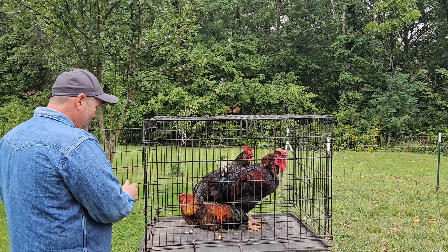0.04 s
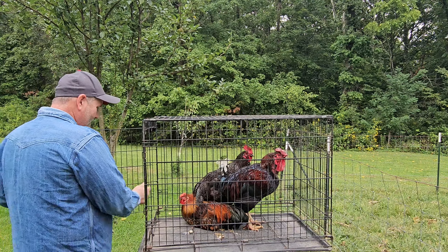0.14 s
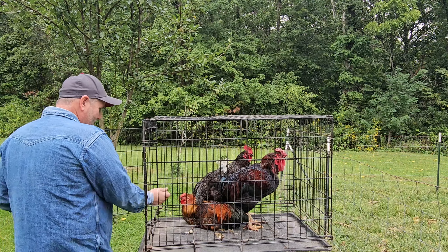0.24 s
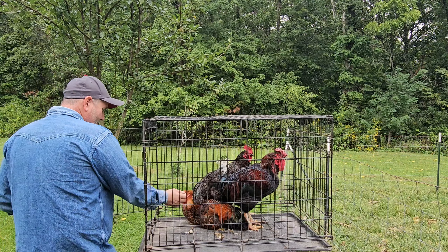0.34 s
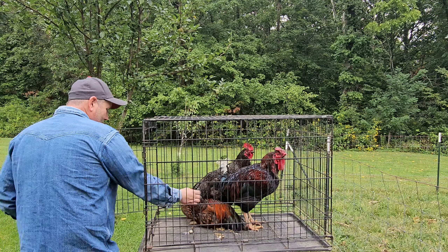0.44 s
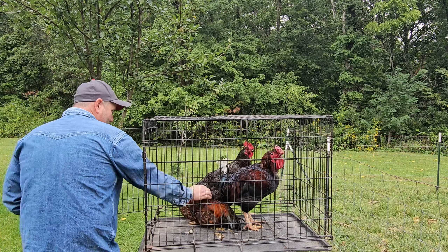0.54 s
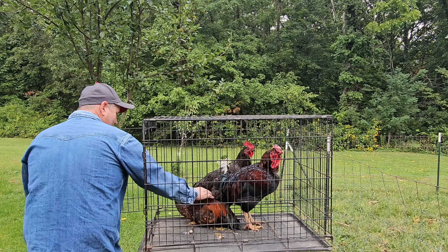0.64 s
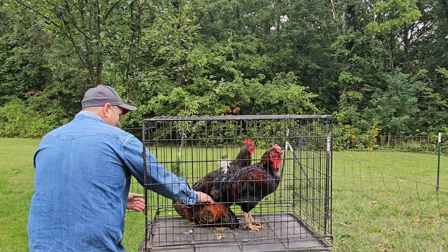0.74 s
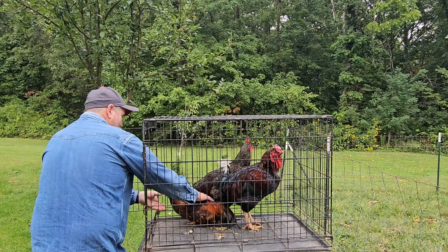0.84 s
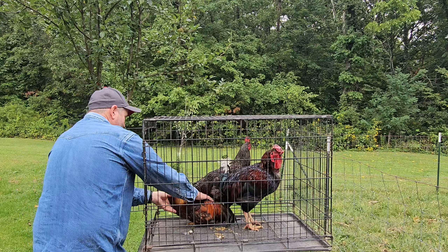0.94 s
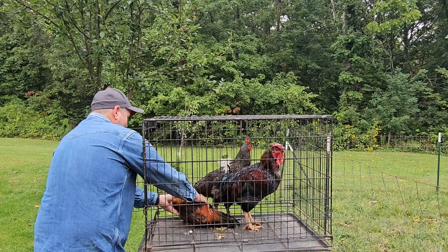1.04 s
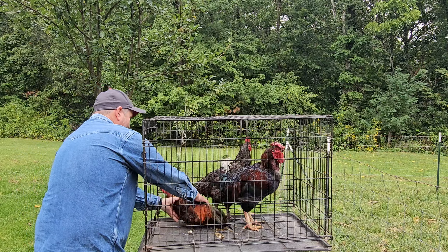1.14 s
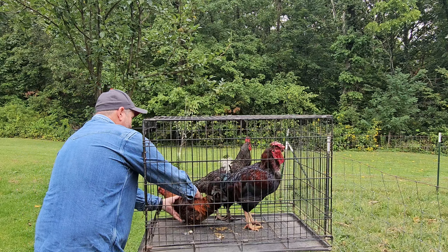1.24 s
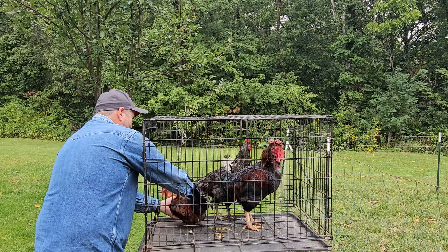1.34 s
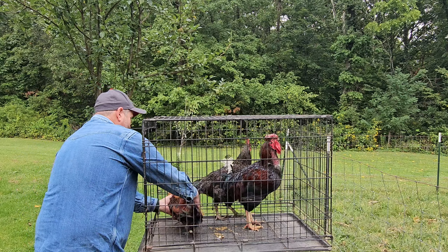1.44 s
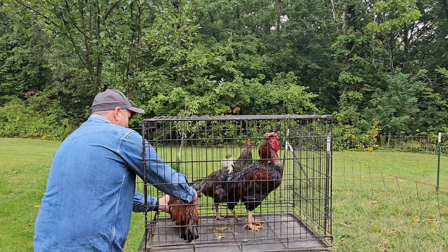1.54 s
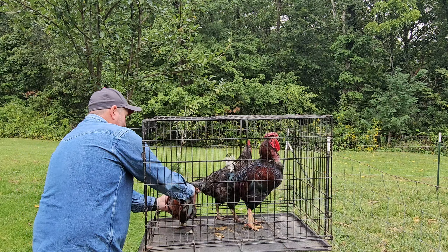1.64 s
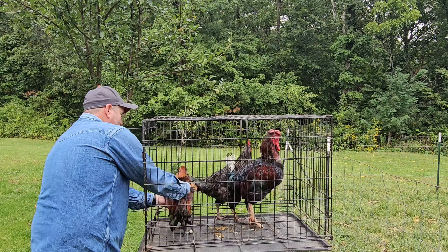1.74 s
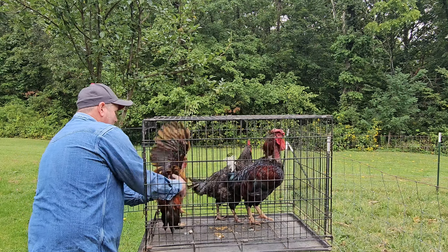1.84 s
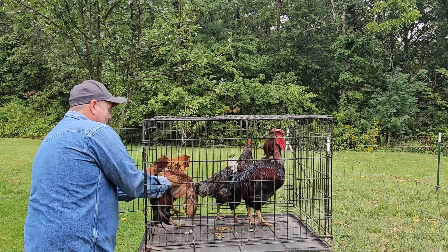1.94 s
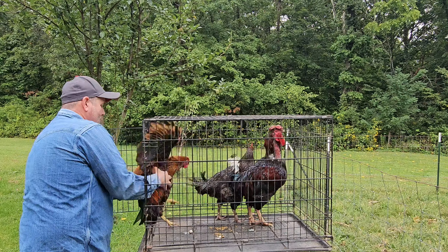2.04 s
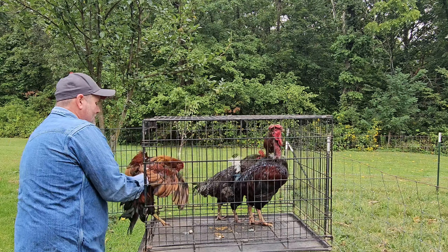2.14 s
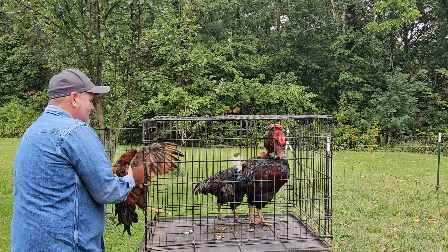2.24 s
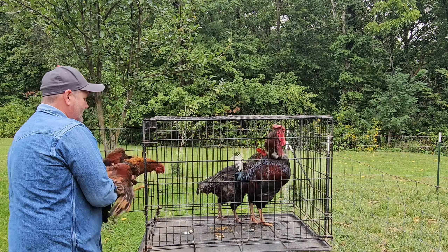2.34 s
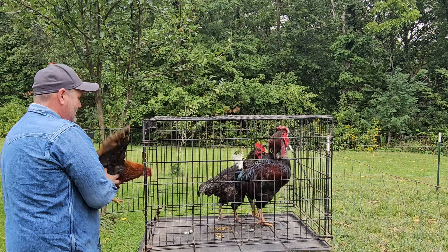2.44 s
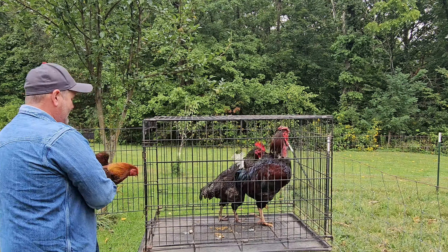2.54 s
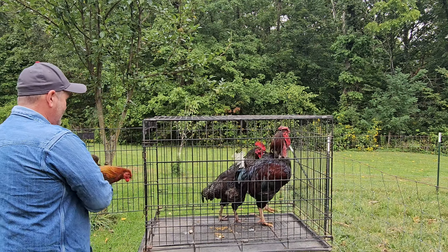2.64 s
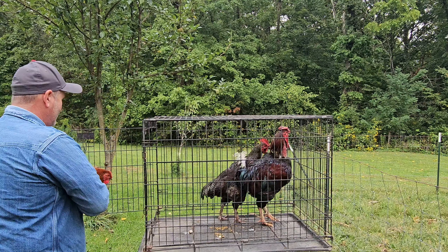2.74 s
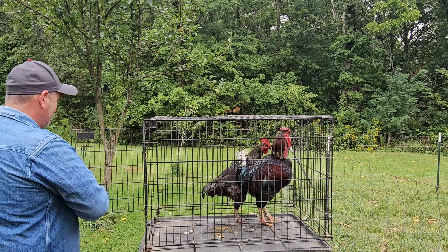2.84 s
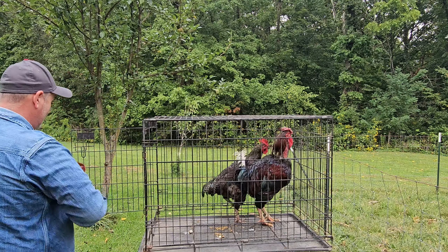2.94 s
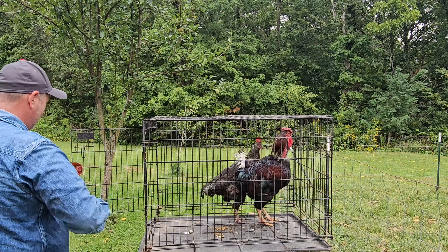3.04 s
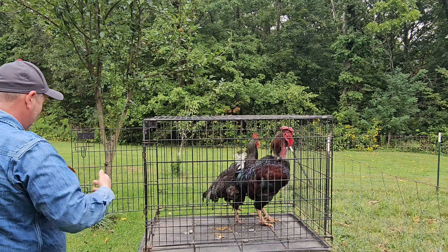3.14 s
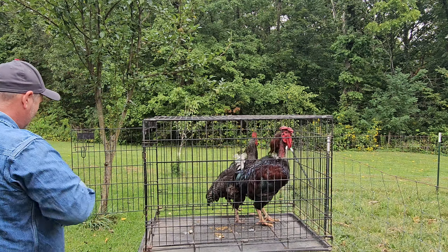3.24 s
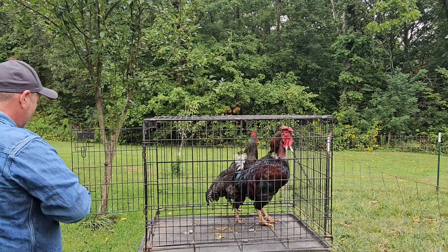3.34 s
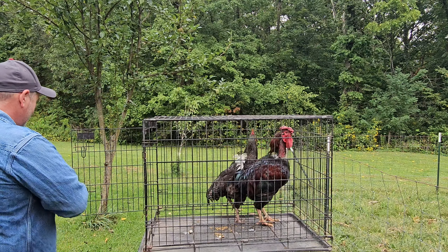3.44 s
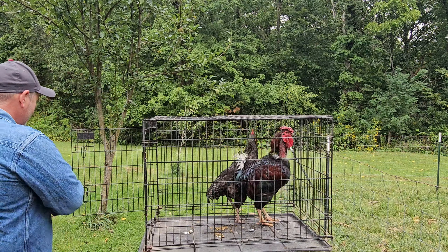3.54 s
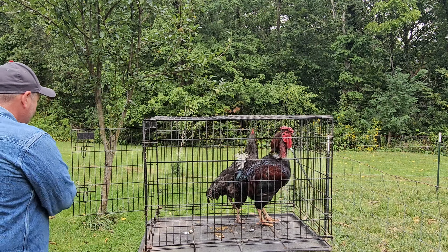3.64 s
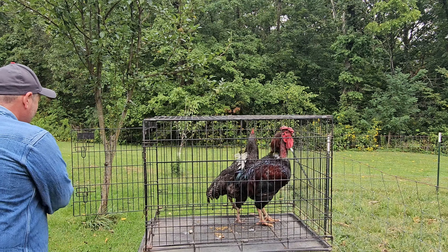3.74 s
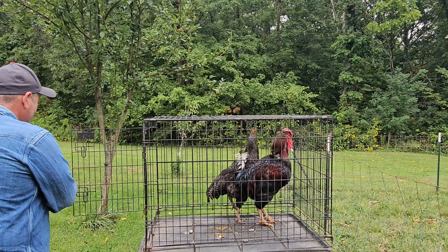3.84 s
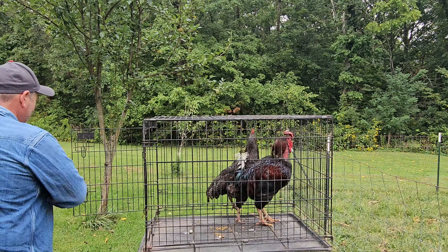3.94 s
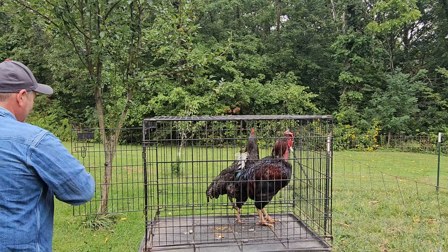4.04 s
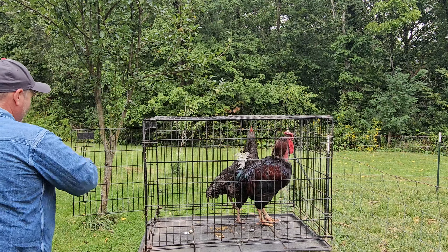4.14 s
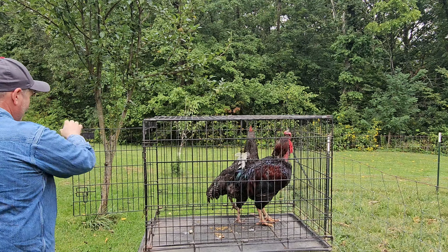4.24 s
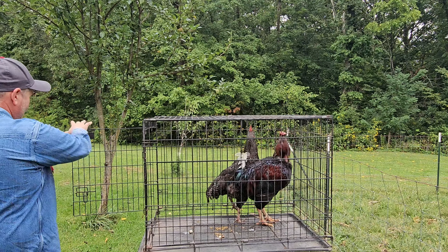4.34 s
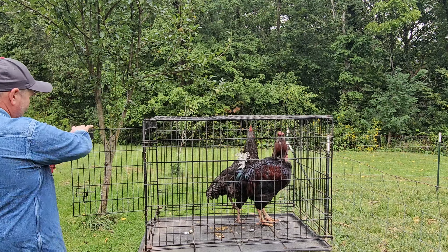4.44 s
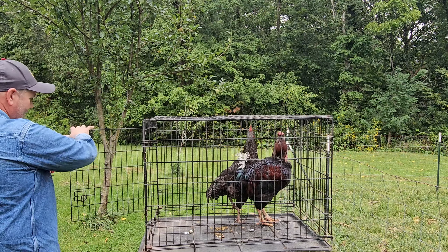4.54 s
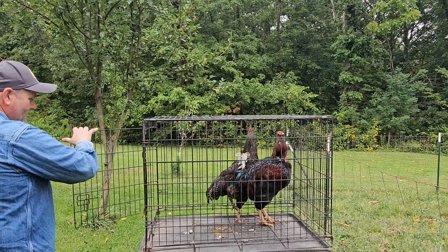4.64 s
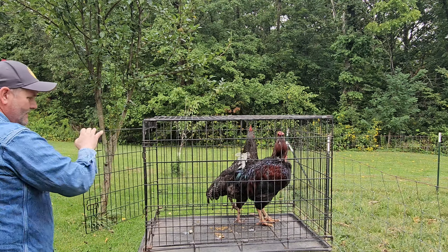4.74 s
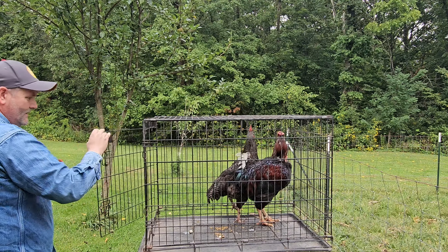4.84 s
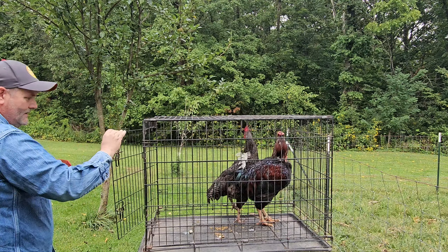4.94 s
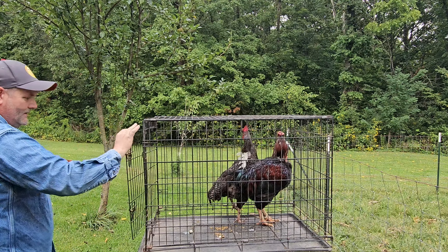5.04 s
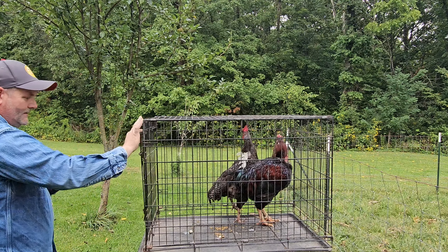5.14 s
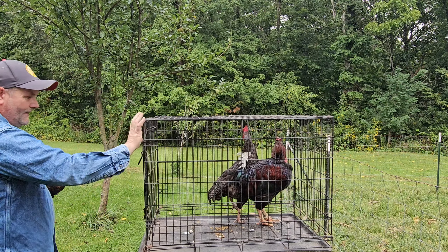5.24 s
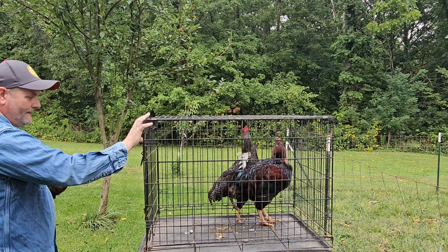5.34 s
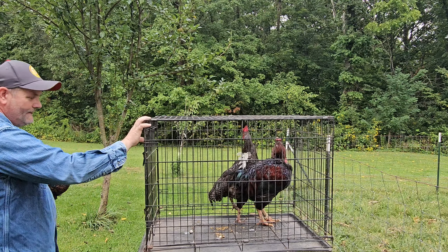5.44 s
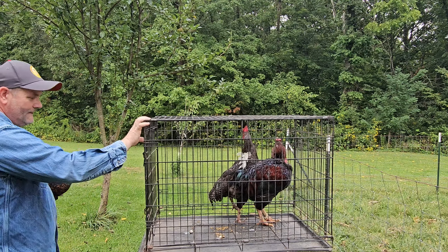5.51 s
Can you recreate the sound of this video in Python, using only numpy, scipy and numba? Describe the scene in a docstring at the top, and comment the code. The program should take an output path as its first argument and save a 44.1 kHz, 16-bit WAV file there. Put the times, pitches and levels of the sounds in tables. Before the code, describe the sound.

Over faint high insects and quiet air, a held rooster clucks softly, then protests in harsh, rising squawks as wings beat and claws scrape a wire crate with a booming plastic floor. The struggle fades to spaced clucks, some lower from a caged bird. Finally the metal door shakes and clatters closed. Nearby microphones, dry open air, slight echo from trees.

```python
"""Roosters in a wire crate

Roosters cluck and squawk in a wire crate on a lawn while one is pulled out, flapping and kicking the plastic tray.
Then the wire door swings and rattles shut. Insects sing in the wood behind, which sends back a faint echo.
Voices are pulse trains through throat and beak; feathers, gusts, cloth, insects and air are coloured noise;
tray, wires and frame are ringing tones set off by short crackles."""
import sys
import numpy as np
from scipy import signal
from scipy.fft import rfft, irfft, next_fast_len
from scipy.io import wavfile
from scipy.ndimage import uniform_filter1d
from numba import njit

SR = 44100
rng = np.random.default_rng(int(sys.argv[2]) if len(sys.argv) > 2 else 0)


def to_wav(sig):
    """Store sig (one row per channel, or 1-D mono) as 16-bit WAV at the path in sys.argv[1].

    Samples outside -1..1 are clipped; the rate is SR.
    """
    pcm = np.clip(np.atleast_2d(sig), -1, 1) * 32767
    pcm = np.round(pcm).astype(np.int16)
    wavfile.write(sys.argv[1], SR, pcm.T)  # frames by channels


N = 245754
TIME = np.arange(N) / SR
CUTOFF_HZ = 16000  # nothing is kept above this
# Feet and wings striking the crate, before each part's own gain: t/s, tray level/dB, wire level/dB
KNOCKS = [(0.118, -55.5, -56), (0.548, -53, -51), (0.674, -53, -71), (.94, -45.5, -59), (1.085, -40, -45),
          (1.123, -46, -39.5), (1.149, -32.5, -36), (1.19, -34, -37), (1.205, -44, -47.5),
          (1.591, -19.5, -26.5), (1.598, -34, -57), (1.988, -29.5, -36.5), (2.005, -33, -35.5),
          (2.038, -39.5, -41), (2.068, -36, -39), (2.875, -43.5, -50), (3.073, -49, -66),
          (3.627, -47.5, -66)]


def from_db(db):
    """Turn decibels into a gain."""
    return 10 ** (np.asarray(db) / 20)


def rms_one(x):
    """Scale a sound to an average power of 1."""
    return x / np.sqrt(np.mean(x ** 2) + 1e-20)


def at_hz(points, hz):
    """Read a table along a logarithmic frequency axis, as the ear spaces pitch."""
    f, value = np.transpose(points)
    return np.interp(np.log(np.maximum(hz, 1)), np.log(f), value)


def level(rows):
    """Gain over time from (t/s, level/dB) rows, practically silent outside them."""
    s, db = np.transpose(rows)
    return from_db(np.interp(TIME, s, db, left=-120, right=-120))


def swell(s, rise_s, decay_s, hold_s=0):
    """An envelope of height 1: grows until s, holds, then dies away exponentially."""
    growing = np.maximum(s - TIME, 0) / abs(rise_s)
    dying = np.maximum(TIME - s - hold_s, 0) / abs(decay_s)
    return np.exp(-np.minimum(growing + dying, 20))


def shape(x, gain_at):
    """Filter by a gain given as a function of frequency."""
    size = next_fast_len(x.shape[-1] + 2048)  # spare room at the end limits wrap-around
    hz = np.arange(size // 2 + 1) * SR / size
    return irfft(rfft(x, size) * gain_at(hz), size)[..., :x.shape[-1]]


def colour(x, spectrum):
    """Filter by an (f/Hz, level/dB) table."""
    return shape(x, lambda hz: from_db(at_hz(spectrum, hz)))


def highpass(x, order, hz):
    """Keep what lies above a frequency."""
    return signal.sosfilt(signal.butter(order, hz, "high", fs=SR, output="sos"), x)


def drift(rate, size=N):
    """Smooth random wandering with a spread near 1, heading for `rate` new values a second."""
    at = np.arange(size) * rate / SR
    return np.interp(at, np.arange(size), rng.standard_normal(size))


def ring(clicks, hz, t60):
    """A unit click sets a sine of height 1 ringing; it falls by 60 dB in t60 seconds."""
    r, w = from_db(-60 / (t60 * SR)), 2 * np.pi * hz / SR
    return signal.lfilter([0, np.sin(w)], [1, -2 * r * np.cos(w), r * r], clicks + 1e-18)


def ring_modes(clicks, modes):
    """A solid body rings in several (f/Hz, level/dB, t60/s) modes with alternating signs."""
    return sum((-1) ** k * from_db(db) * ring(clicks, hz, t60) for k, (hz, db, t60) in enumerate(modes))


def burst(s, decay_s, rise_s=0.002):
    """A contact: a short crackle of unit energy that starts at s, swells and dies."""
    out, start = np.zeros(N), int(s * SR)
    age = np.arange(min(4096, N - start)) / SR
    crackle = rng.standard_normal(len(age)) * np.exp(-age / decay_s) * (1 - np.exp(-age / rise_s))
    out[start:start + len(age)] = crackle / np.linalg.norm(crackle)
    return out


def spread(pair):
    """Two unrelated signals become a stereo sound, alike in the bass and apart in the treble."""
    # How alike the left and right microphones hear: f/Hz, likeness (1 = the same, 0 = unrelated)
    likeness = [(30, .86), (80, .98), (250, .95), (1200, .96), (2000, .45), (4000, .1), (8000, 0),
                (16000, 0)]
    alike = lambda hz: np.clip(at_hz(likeness, hz), -1, 1)
    mid = shape(pair[0], lambda hz: np.sqrt((1 + alike(hz)) / 2))
    side = shape(pair[1], lambda hz: np.sqrt((1 - alike(hz)) / 2))
    return np.array([mid + side, mid - side])


def noise(spectrum):
    """Smooth stereo noise of a given colour."""
    return rms_one(spread(colour(rng.standard_normal((2, N)), spectrum)))


def from_left(pair, lead_s=.00012):
    """Sound arriving from the left reaches the right microphone later."""
    return np.array([pair[0], np.pad(pair[1], (round(lead_s * SR), 0))[:N]])


def meadow(insect_db=-60, air_db=-62, hum_db=-64, hum_hz=154, hum_t60=1.0):
    """Insects and still air are steady coloured noise; the distant hum is noise ringing at one pitch."""
    # Colour of the insect chorus: f/Hz, level/dB
    chorus = [(2500, -38.5), (3800, -15.5), (4400, 1.5), (4950, 5.5), (5600, -1), (6500, -2.5),
              (7500, -9.5), (9000, -21.5), (16000, -35)]
    # Colour of the still air: f/Hz, level/dB
    still_air = [(25, -16), (80, 1), (160, 1.5), (300, -10), (500, -14.5), (1000, -17.5), (2000, -21.5),
                 (4000, -20), (8000, -33), (10300, -39.5), (13000, -29), (16000, -30.5)]
    # Slow swelling of the hum around its basic level: t/s, level/dB
    hum_swell = [(0, 1), (.8, 5), (1.5, 0), (3.9, -16.5), (4.3, -2.5), (4.7, -23), (5.6, 1)]
    hum = rms_one(ring(rng.standard_normal(N), hum_hz, hum_t60))
    insects = from_db(insect_db) * noise(chorus)
    return insects + from_db(air_db) * noise(still_air) + from_db(hum_db) * level(hum_swell) * hum


def feathers(clump_db=4, grain_db=2.0, rustle_db=-2, flick_db=19):
    """Barbs slip in clumps of tiny grains; stiff quills and claws snap past the bars."""
    # How hard the held bird struggles, before the gains below: t/s, rustle level/dB
    struggle = [(0, -57), (.35, -69), (.62, -60), (.78, -84), (.95, -55.5), (1.2, -55.5), (1.68, -51),
                (1.78, -59), (1.92, -41), (2.4, -46), (2.8, -65), (3.15, -57), (3.53, -62.5), (3.9, -75),
                (5.57, -82)]
    # A wing or tail brushing past hands and bars, before those gains: t/s, peak level/dB, swell/s, decay/s
    brushes = [(.685, -49.5, 0.014, 0.013), (1.115, -49, .025, 0.091), (1.48, -41.5, 0.06, 0.13),
               (1.598, -32, 0.02, 0.021), (1.98, -45, 0.08, 0.058), (2.199, -31.5, .028, .02),
               (2.489, -34, 0.029, 0.028), (2.655, -46, 0.15, 0.057), (2.89, -62, 0.022, 0.027)]
    # Quills and claws flicking the bars, before flick_db and the gain at the end: t/s, level/dB
    flick_rows = [(0.6454, -37), (0.6753, -34), (1.1022, -31.5), (1.1268, -29), (1.1498, -20),
                  (1.1906, -29), (1.2048, -28.5), (1.422, -33), (1.5207, -23), (1.5441, -22.5),
                  (1.5628, -26), (1.5835, -20), (1.6942, -34), (1.8777, -33), (1.9082, -25), (1.9875, -30),
                  (2.003, -27), (2.0378, -27), (2.0688, -29.5), (2.1181, -29.5), (2.1934, -20),
                  (2.4024, -25.5), (2.4523, -27.5), (2.8906, -36.5)]
    # Colour of feathers: f/Hz, level/dB
    feather_colour = [(300, -2), (700, 2), (1500, -4), (3000, 0), (4500, -3.5), (6800, -1), (8500, -10),
                      (10300, -20), (12000, -12.5), (16000, -21.5)]
    grains = rng.standard_normal((2, N)) * from_db(grain_db * drift(2500) + clump_db * drift(130))
    brushing = sum((from_db(db) * swell(s, rise_s, decay_s)) ** 2 for s, db, rise_s, decay_s in brushes)
    sliding = from_db(rustle_db) * np.sqrt(level(struggle) ** 2 + brushing) * rms_one(grains)
    flick_side = lambda: sum(from_db(db + flick_db) * burst(s, .0035, rise_s=.003) for s, db in flick_rows)
    flicks = highpass(np.array([flick_side() for side in range(2)]), 1, 3500)
    return from_db(8.0) * spread(colour(sliding + flicks, feather_colour))


def tray(contact_s=0.0014, tray_db=-2):
    """Each knock sets the plastic floor booming in its own modes."""
    # Modes of the plastic tray: f/Hz, level/dB, t60/s
    tray_modes = [(90, -8, 0.14), (136.7, -13, 0.24), (202.6, -11, 0.12), (252.8, -8, 0.29),
                  (452, -6, 0.12), (507.5, -4.5, 0.29), (591, -3, 0.1), (776, -1.5, 0.11),
                  (831, -4.5, 0.12), (1130, -2, 0.023), (1390, -14, 0.11), (1750, -20.5, 0.0077)]
    blows = sum(from_db(db) * burst(s, contact_s) for s, db, wire_db in KNOCKS)
    return from_db(tray_db) * ring_modes(blows, tray_modes)


def wires(drive, t60_at_1khz=0.14, damping_slope=0.48, ring_db=-11, count=170):
    """The welded bars have many close modes, and the higher ones die sooner."""
    # Strength of the wire modes along the spectrum: f/Hz, level/dB
    wire_colour = [(700, -9), (1300, -3), (2000, -1), (3200, 0), (4500, -3), (7000, -1), (10000, -10),
                   (15000, -9)]
    out = np.zeros((2, N))
    mode_hz = np.linspace(np.sqrt(700), np.sqrt(15500), count) ** 2
    for hz, (detune, left, right) in zip(mode_hz, rng.standard_normal((count, 3))):
        t60 = t60_at_1khz * (1000 / hz) ** damping_slope
        mode = from_db(at_hz(wire_colour, hz)) * ring(drive, hz * (1 + 0.0147 * detune), t60)
        out[0] += np.sign(left) * mode
        out[1] += right * mode
    return from_db(ring_db) * spread(out)


def jostling(door, jostle_db=-6, jostle_t60=0.82):
    """The loose panels store the door's energy and give it back slowly as a fluttering rattle."""
    # Colour of the jostling panels: f/Hz, level/dB
    jostle_colour = [(40, -17), (80, 6.5), (150, -14), (240, 11), (330, -8.5), (500, 8.5), (670, -12),
                     (850, 3.5), (1100, -3), (2000, -5.5), (3000, -2), (4500, -13.5), (7000, -18),
                     (16000, -44)]
    keep = from_db(-120 / (jostle_t60 * SR))  # energy, so twice the decibels
    stored = signal.lfilter([1 - keep], [1, -keep], door ** 2)
    return from_db(jostle_db) * np.sqrt(stored) * noise(jostle_colour) * from_db(2.2 * drift(70))


def cage(chatter_db=-34, frame_db=-8, kick_frame_db=-22, clink_db=6, ticks_per_s=2500):
    """Kicks and the chattering door shake the bars; the frame rings briefly and the loose panels jostle on."""
    # The door jolts on its hinges, then chatters on the frame, before the gains above:
    # t/s, level/dB, hold/s, decay/s, added clinking level/dB
    door_hits = [(4.827, -48, 0.015, 0.046, -13), (5.271, -35.5, 0.041, 0.034, 0.5)]
    # Bending modes of the frame: f/Hz, level/dB, t60/s
    frame_modes = [(153, -4, .4), (200, -4, .35), (244, -2, .35), (455, -8, .25), (502, -7, .25),
                   (805, -7, .25), (867, -6, .25), (1370, -3, .2), (1950, -2, .2), (2025, 0, .2),
                   (2570, -3, .18), (2835, -2, .18), (2915, -1, .2), (3155, -3, .18), (6310, 0, .12)]
    # Colour of wire ticking on wire: f/Hz, level/dB
    clink_colour = [(300, -29), (1500, -10.5), (4000, -9.5), (6800, -9), (8500, -10.5), (10300, -13),
                    (12000, -9), (16000, -17)]
    door, clinking = np.zeros(N), np.zeros(N)
    for s, db, hold_s, decay_s, bright_db in door_hits:
        jolt = from_db(db) * swell(s, 0.0053, decay_s, hold_s)
        door += jolt
        clinking += jolt * from_db(bright_db)
    # both channels tick at the same random moments, with different strengths
    chatter = rms_one(rng.standard_normal((2, N)) * (rng.random(N) < ticks_per_s / SR))
    shaking = from_db(chatter_db) * door * chatter[0]
    kicks = sum(from_db(db) * burst(s, 0.0012) for s, tray_db, db in KNOCKS)
    frame = from_db(frame_db) * ring_modes(shaking + from_db(kick_frame_db) * kicks, frame_modes)
    clinks = from_db(clink_db) * spread(colour(clinking * chatter, clink_colour))
    return wires(kicks + shaking) + frame + jostling(door) + clinks


def sleeves():
    """Shirt sleeves slide as the arms reach: bright noise that comes and goes."""
    # Loudness of the sliding cloth: t/s, level/dB
    sleeve_level = [(.33, -72), (.5, -60.5), (.63, -49), (.72, -76), (2.9, -73), (3.17, -54), (3.33, -69),
                    (3.42, -71), (3.53, -57.5), (3.8, -83)]
    # Colour of the cloth: f/Hz, level/dB
    cloth_colour = [(500, -22), (3000, -8), (7000, 5), (10300, -5.5), (12500, 3), (16000, -2.5)]
    return level(sleeve_level) * noise(cloth_colour)


@njit
def throat(x, hz, width, sr):
    """A hollow space strengthens one band of pitches; here its centre moves."""
    y, r = np.zeros(len(x)), np.exp(-np.pi * width / sr)
    for i in range(2, len(x)):
        turn = 2 * r * np.cos(2 * np.pi * hz[i] / sr)
        y[i] = x[i] - x[i - 2] + turn * y[i - 1] - r * r * y[i - 2]
    return y


def evened(x):
    """Hold the level near 1 by dividing by the average over about 9 ms."""
    return x / np.sqrt(np.abs(uniform_filter1d(x * x, 400)) + 1e-12)


def call(row, beak, throat_width_hz, jitter, shimmer, throat_rasp, beak_rasp):
    """One cluck or squawk: the syrinx (voice organ) pulses, less evenly when rough, through throat and beak."""
    (s, rise_s, fall_s, swell_db, start_hz, top_hz, end_hz,
     low_db, throat_db, centre_hz, beak_db, roughness) = row
    catch_s = .014  # the voice fades in over this time
    span = np.arange(int((s - rise_s - catch_s / 2) * SR), int((s + fall_s) * SR))
    t, size = span / SR, len(span)
    before, after = np.clip((s - t) / rise_s, 0, 1), np.maximum(t - s, 0) / fall_s

    # it swells to the climax, then is choked off by 23.5 dB; the pitch bends along
    effort = from_db(-swell_db * before - 23.5 * after ** 2.01)
    pitch = top_hz + (start_hz - top_hz) * before ** 1.5 + (end_hz - top_hz) * after ** 1.266
    throat_hz = centre_hz * pitch / top_hz  # the throat tightens with the syrinx
    # the resonance narrows as the throat level rises above -32 dB, an ordinary cluck
    width_hz = throat_width_hz * np.exp(-0.017 * (throat_db + 32))
    # extra roughness while the voice catches and lets go
    rough = roughness + 0.43 * (before + after) ** 2

    phase = 2 * np.pi * np.cumsum(pitch * (1 + jitter * rough * drift(496.2, size))) / SR
    order = np.arange(2, int(CUTOFF_HZ / pitch.max()))[:, None]
    overtones = rms_one(np.cos(order * phase).sum(0))
    # air hisses through once a cycle; under strain every other cycle is weaker
    hiss = rms_one(rng.standard_normal((2, size)) * (1 + 0.2 * np.cos(phase)))
    overtones = overtones * (1 + .35 * rough * np.cos(phase / 2))
    voiced = overtones + throat_rasp * rough * hiss[0]
    for stage_hz in (width_hz, 2 * width_hz, 2 * width_hz):
        voiced = throat(voiced, throat_hz, stage_hz, SR)
    bright = highpass(colour(overtones + beak_rasp * (rough + 0.25) * hiss[1], beak), 4, 1600)

    fundamental = from_db(low_db) * np.sqrt(2) * np.sin(phase)
    sound = effort * (fundamental + from_db(throat_db) * evened(voiced) + from_db(beak_db) * evened(bright))
    tremor = 1 + np.clip(shimmer * rough, 0, .7) * np.tanh(drift(220, size))
    catch = np.sin(np.pi / 2 * np.minimum((t - t[0]) / catch_s, 1)) ** 2
    out = np.zeros(N)
    out[span] = sound * tremor * catch * signal.windows.tukey(size, .1)
    return out


def placed(voice, lead_s, scatter_db=-5, scatter_s=0.0071, ground_db=-22, ground_s=0.019):
    """A voice reaches one microphone first; the bars scatter its overtones, crate and lawn add a short blur."""
    direct = np.array([voice, np.interp(TIME - lead_s, TIME, voice)])
    treble = highpass(voice, 4, 2000)

    def blur(x, decay_s):
        """Many tiny reflections smear a sound, differently at each microphone."""
        smear = lambda: np.trim_zeros(burst(0.00075, decay_s), "b")
        return np.array([signal.oaconvolve(x, smear())[:N] for side in range(2)])

    return direct + from_db(scatter_db) * blur(treble, scatter_s) + from_db(ground_db) * blur(voice, ground_s)


def roosters():
    """The held bird protests shrilly; one left in the crate answers with low, hollow clucks."""
    # Each call swells to a climax and is choked off; its pitch bends from start through climax to end.
    # Calls of the held bird: climax t/s, rise/s, fall/s, swell/dB, start f/Hz, climax f/Hz, end f/Hz,
    # fundamental level/dB, throat level/dB, throat f/Hz, beak overtone level/dB, roughness (0-1)
    held_calls = [ (.522, 0.017, .021, 4, 533, 533, 395, -36, -42, 1110, -47, 0.5),
                  (0.903, 0.02, 0.029, 6.5, 440.5, 503.4, 410, -36, -37, 1090, -48.5, 0.46),
                  (.994, 0.0081, 0.03, 4, 473, 489, 408, -41.5, -45, 860, -64, 0.56),
                  (1.147, 0.013, 0.015, 15, 454.4, 487, 450, -31.5, -36, 1150, -38.5, 0.59),
                  (1.345, .023, 0.013, 10, 458, 553.3, 477, -34.5, -31, 1030, -45, 0.44),
                  (1.503, 0.024, 0.032, 9, 554, 526, 514, -36, -40, 1220, -44, 0.45),
                  (1.722, .025, 0.022, 5.5, 487, 570, 555, -32, -32.5, 1150, -42, 0.38),
                  (1.910, 0.028, 0.017, 8.5, 534, 639, 580, -35.5, -34, 1340, -44.5, 0.59),
                  (1.986, 0.024, 0.018, 5.5, 569, 617, 540, -42.5, -30.5, 1280, -39.5, .68),
                  (2.146, 0.05, 0.042, 4.5, 598, 644.4, 595, -44, -22.5, 1250, -33.5, 0.56),
                  (2.283, 0.037, .020, 12, 621, 642.3, 650, -51.5, -15.5, 1290, -32.5, .1),
                  (2.374, .030, 0.029, 11, 644, 622, 603, -43, -21.5, 1314, -34, .45),
                  (2.484, .020, 0.049, 16, 611, 641, 609, -41.5, -20.5, 1304, -30, 0.61),
                  (2.547, .016, 0.033, 6.5, 468, 488, 396, -43, -37.5, 1020, -52, 0.8),
                  (2.688, .034, .032, 6.5, 555, 616, 532, -32, -33.5, 1220, -36.5, 0.2),
                  (2.797, 0.02, 0.061, 13.5, 530, 564.5, 488, -36.5, -28.5, 1080, -41.5, 0.56),
                  (3.045, 0.035, 0.017, 19.5, 490, 549, 538, -29.5, -22, 990, -42, 0.1),
                  (3.359, 0.019, 0.017, 9, 496, 455.4, 408, -46.5, -29, 884, -54, 0.22),
                  (3.723, 0.03, 0.016, 11, 392, 425, 375, -53.5, -28, 966, -49, 0.56),
                  (4.156, 0.029, 0.017, 18, 441, 548, 528, -37.5, -27, 1100, -47.5, 0.12), ]
    # Low clucks of the bird left in the crate: climax t/s, rise/s, fall/s, swell/dB, start f/Hz,
    # climax f/Hz, end f/Hz, fundamental level/dB, throat level/dB, throat f/Hz, beak overtone level/dB,
    # roughness (0-1)
    caged_calls = [ (1.107, .012, 0.013, 5.2, 230.5, 254, 220, -39, -41, 580, -55, 0.68),
                   (2.658, .036, .014, 4.5, 214.7, 312, 315, -47.5, -36.5, 647, -60, 1),
                   (2.856, .019, 0.014, 8.2, 241, 211, 222, -38.5, -34, 710, -55, 0.35),
                   (3.240, 0.029, 0.015, 9.4, 206.3, 361.3, 340, -40, -29.5, 700, -45.5, 0.12),
                   (3.484, 0.013, 0.042, 10, 242.6, 263.8, 370, -39.5, -32.5, 503, -41.5, 0.38),
                   (3.738, .011, .028, 13, 256, 232.6, 207, -41, -37, 512, -50.5, 0.19),
                   (3.966, .018, 0.034, 7, 227, 221.6, 187, -48, -48, 520, -70, 0.55), ]
    # Overtones leaving the wide open beak: f/Hz, level/dB
    open_beak = [(1500, -18), (1850, 4.5), (2300, -4.5), (2900, 1), (3400, -4.5), (3950, 3), (5000, -14),
                 (6800, -3.5), (8500, -8.5), (10300, -23), (12000, -19), (14000, -20.5), (16000, -24)]
    # Overtones leaving the nearly shut beak: f/Hz, level/dB
    shut_beak = [(1500, -1.5), (2100, -11.5), (2340, 10), (2600, -14), (3000, -8), (3600, -20),
                 (4200, -6.5), (6000, -19), (16000, -38)]
    # The held bird is carried to the left: t/s, lead at the left microphone/s
    held_lead = [(0, .00007), (2.3, .00007), (3.0, .00018), (4.2, .00026)]
    held = sum(call(row, open_beak, throat_width_hz=445, jitter=.075, shimmer=1,
                    throat_rasp=1.25, beak_rasp=1.9) for row in held_calls)
    caged = sum(call(row, shut_beak, throat_width_hz=233, jitter=.11, shimmer=.9,
                     throat_rasp=1.0, beak_rasp=1.3) for row in caged_calls)
    return placed(held, np.interp(TIME, *np.transpose(held_lead))) + placed(caged, lead_s=-0.00011)


def wings(air_db=-1.5, flutter_db=3):
    """Each beat of the struggling bird pushes a dull, fluttering gust of air."""
    # Wing beats and body shoves, before air_db: t/s, peak level/dB, decay/s
    beats = [(1.125, -47, .035), (1.18, -42, 0.018), (1.25, -47.5, 0.2), (1.6, -36, 0.13),
             (2.0, -30, 0.039), (2.040, -32, 0.0349), (2.13, -43, 0.031), (2.225, -46, 0.21),
             (2.48, -39.5, 0.026), (2.63, -45, 0.091), (2.88, -38.5, 0.011), (3.034, -39, 0.099),
             (3.22, -42, 0.02), (3.36, -43, 0.019), (3.48, -53, .03), (3.71, -47.5, .03)]
    # Colour of the pushed air: f/Hz, level/dB
    whoosh_colour = [(30, -27.5), (70, -10.5), (130, -5), (205, 1), (340, -13), (600, -13.5), (1200, -20.5),
                     (3000, -21.5), (16000, -75)]
    gusts = sum(from_db(db) * swell(s, .014, decay_s) for s, db, decay_s in beats)
    return from_db(air_db) * gusts * rms_one(noise(whoosh_colour) * from_db(flutter_db * drift(45)))


def plucked_bar():
    """A claw catches one bar, which rings bright and short."""
    # The pluck, a single click: t/s, level/dB
    pluck_row = (1.151, -26)
    # Modes of the plucked bar: f/Hz, level/dB, t60/s
    bar_modes = [(2940, 3, 0.041), (3070, -2, 0.095), (3430, 2, 0.054), (3630, -2, 0.12)]
    s, db = pluck_row
    return ring_modes(from_db(db) * signal.unit_impulse(N, int(s * SR)), bar_modes)


def wood(x, tail_db=-31, tail_t60=0.34):
    """The trees send back a few dull echoes and a thin, fading tail."""
    # Echoes from the edge of the wood: delay t/s, level/dB
    echoes = [(.092, -32.5), (0.113, -37.5), (0.139, -39), (.19, -34.5), (0.211, -39.5)]
    age = TIME[:SR]
    tail = rng.standard_normal((2, SR)) * from_db(-60 * age / tail_t60)
    response = from_db(tail_db) * rms_one(tail) / np.sqrt(SR)
    for delay, db in echoes:
        response[:, int(delay * SR)] += from_db(db)
    dull = signal.sosfilt(signal.butter(1, 3500, fs=SR, output="sos"), x)
    return signal.fftconvolve(dull, response, axes=1)[:, :N]


def scene():
    """The scuffle at the crate door, a little to the left, with the wood behind."""
    scuffle = feathers() + tray() + cage() + sleeves() + wings() + plucked_bar()
    crate = roosters() + from_left(scuffle)
    return from_left(meadow()) + crate + wood(crate)


def record(dry):
    """Each microphone has its own colour; the top is cut."""
    # Balance of the microphone pair: f/Hz, left minus right level/dB
    tilt = [(200, 1.54), (1200, 0), (2200, -2), (4500, -3), (8000, -2), (13000, 6)]
    left = shape(dry[0], lambda hz: from_db(at_hz(tilt, hz) / 2))
    right = shape(dry[1], lambda hz: from_db(-at_hz(tilt, hz) / 2))
    top_cut = signal.ellip(10, .1, 70, CUTOFF_HZ, fs=SR, output="sos")
    return signal.sosfilt(top_cut, np.array([left, right]))


dry = scene()
out = record(dry)
to_wav(out)
```